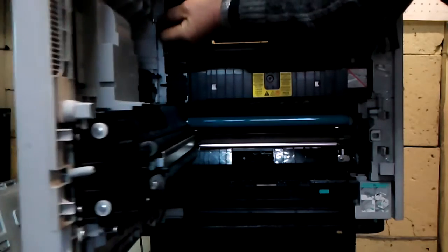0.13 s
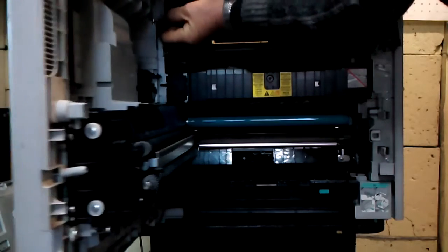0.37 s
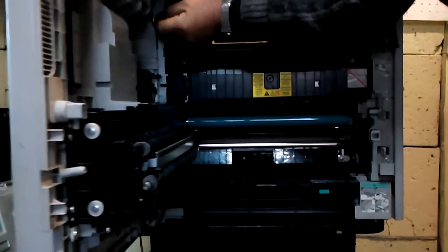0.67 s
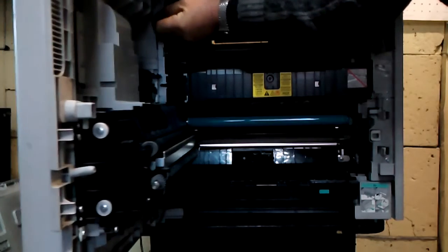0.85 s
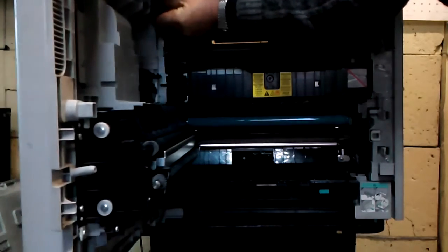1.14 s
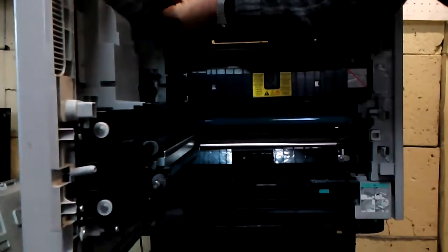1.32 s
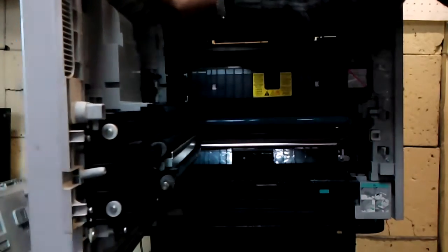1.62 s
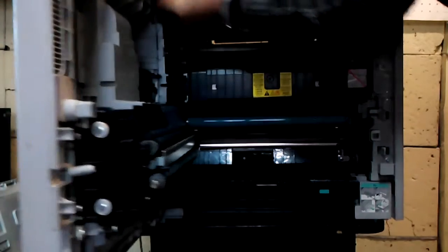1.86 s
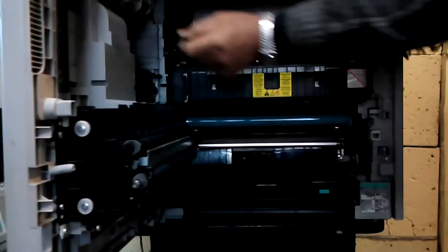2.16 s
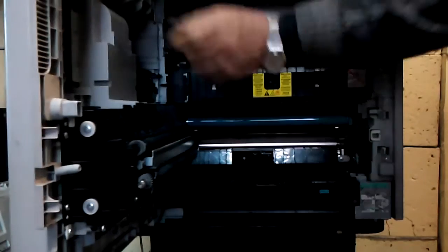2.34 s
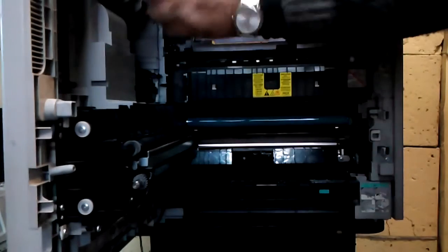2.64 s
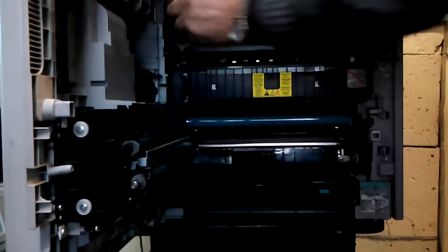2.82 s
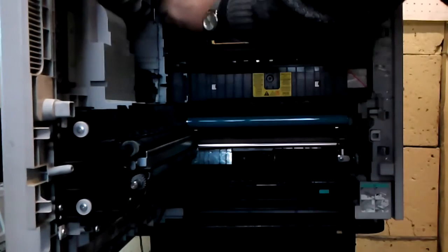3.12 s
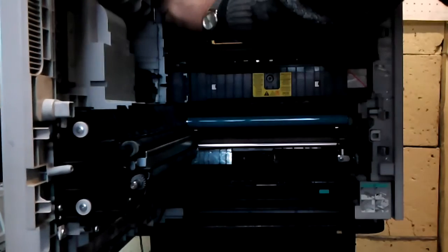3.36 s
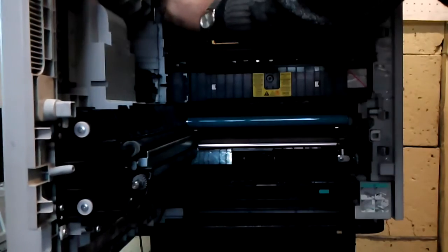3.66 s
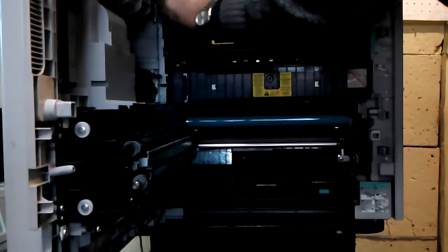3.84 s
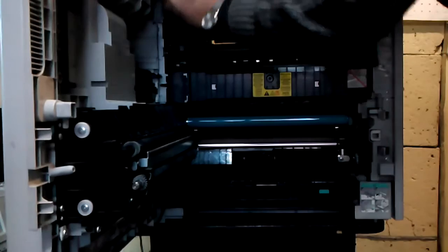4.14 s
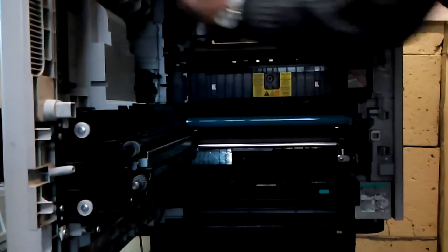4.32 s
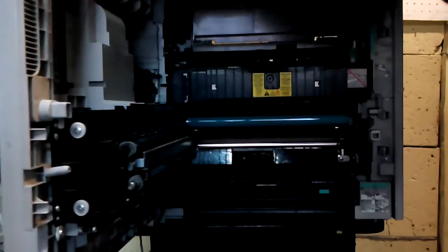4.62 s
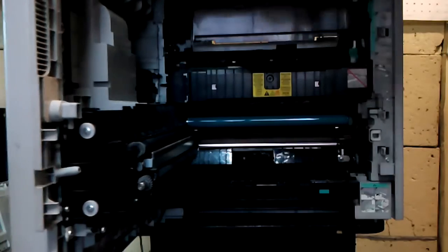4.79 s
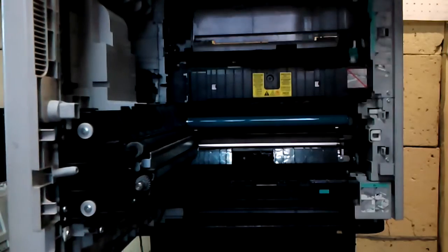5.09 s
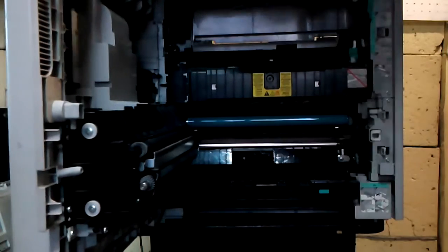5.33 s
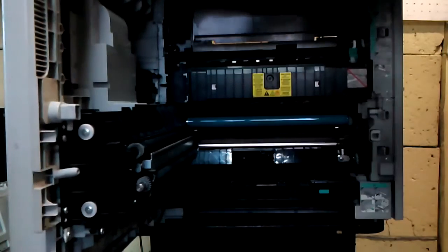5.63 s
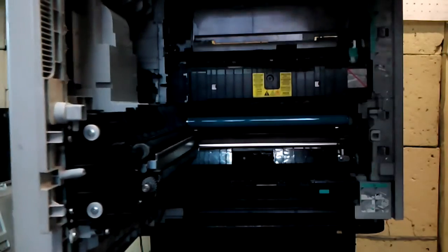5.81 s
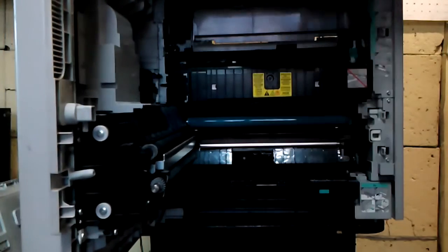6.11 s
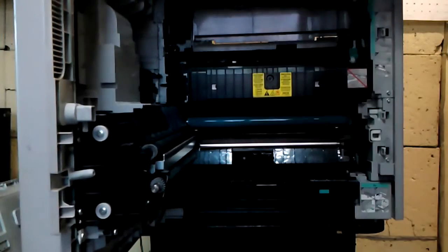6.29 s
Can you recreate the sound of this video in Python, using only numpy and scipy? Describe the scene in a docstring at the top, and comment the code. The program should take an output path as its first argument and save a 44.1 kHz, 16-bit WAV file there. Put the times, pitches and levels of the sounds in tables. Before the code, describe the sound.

Inside a small hard room, a hand works a plastic panel loose from an open copier, heard near a small camera with constant low hiss, very thin whines and rapid faint electrical ticks. A tiny scrape and tap open it; light knocks come at 0.3 and 0.5 s. From 1.0 to 1.3 s brushing, a rub and firm knocks with a dull thump. Between 1.6 and 2.1 s scrapes mix with chattering blows, strongest near 1.85. A hard, loud crack hits at 2.5 s, followed by a short scrape and smaller knocks. Soft rubbing around 3 s leads to a low thump and double knock near 3.4. Sparse clicks at 4.1 to 4.8 s grow into knocks from 5.0 and a sharp crack at 5.25. After soft bumps, a strong airy brush swells at 5.9 s, then a final short bright crack at 6.4. Contacts echo briefly.

```python
"""A hand works a plastic panel loose inside an open office copier, in a small hard room, for 6.5 s.
A small camera's hiss, thin whines and faint electrical ticks per picture run throughout.
From the start come scrapes of stick-slip grains, brushes of fine noise from sleeve and skin, soft bumps
and chattering blows that ring the panel; a hard crack falls near 2.5 s, another near 5.2 s, then a
strong brush near 5.9 s and a last bright crack near 6.4 s. Contacts and strokes echo in the room."""
import sys
import numpy as np
from scipy import signal
from scipy.fft import rfft, irfft
from scipy.io import wavfile
from scipy.ndimage import uniform_filter1d

SR = 44100
rng = np.random.default_rng(int(sys.argv[2]) if len(sys.argv) > 2 else 0)


def materialize(psi):
    """Save the field psi as 16-bit PCM at rate SR to the path in sys.argv[1].

    A 1-D psi becomes a single channel; in a 2-D psi each row is a channel.
    """
    bounded = np.clip(np.atleast_2d(psi).T, -1, 1)
    quanta = np.round(bounded * 32767).astype(np.int16)
    wavfile.write(sys.argv[1], SR, quanta)


N = 285139

# Steady noise bed, relative density: pitch_hz, level_db (per Hz)
HISS_SPECTRUM = [(18, -61), (30, -4), (97, 4.5), (256, 4), (399, -7.5), (830, 0), (945, -6), (1680, -7),
                 (4310, -12.5), (7080, -7.5), (7650, -6.5), (8720, -10), (15500, -15.5)]
# Thin whines: pitch_hz, level_db (rms, before flutter)
WHINE_TONES = [(1168, -89.5), (6449, -87.5), (12898, -98)]
# Wait of the two supply dips after each picture starts, before the next timer tick: delay_ms
DIP_DELAYS = [12.77, 18.63]
# Delay of the two supply steps after each picture starts: delay_ms
STEP_DELAYS = [9.05, 20.65]
# Time for the room to fade by 60 dB: pitch_hz, t60_s
ROOM_FADE = [(150, 0.34), (400, 0.35), (1000, 0.27), (2800, 0.27), (7000, 0.32), (13000, 0.28)]
# Strokes of plastic on plastic: peak_s, rise_s, fall_s, peak_db
SCRAPE_STROKES = [(0, .01, 0.042, -57), (.36, 0.083, 0.35, -65), (.49, .08, 0.086, -64.5),
                  (1.09, 0.031, 0.13, -66.5), (1.19, 0.14, 0.071, -69), (1.28, 0.14, .07, -57),
                  (1.63, 0.1, 0.082, -55.5), (1.73, .08, 0.095, -62.5), (2.06, 0.098, 0.11, -58),
                  (2.14, 0.076, 0.11, -54), (2.317, .01, 0.044, -59.5), (2.37, .08, 0.16, -69.5),
                  (2.626, 0.007, 0.095, -52.5), (2.73, .1, 0.048, -68), (3.21, 0.053, .1, -67),
                  (3.33, 0.045, 0.18, -68.5), (4.16, 0.1, .12, -60.5), (4.69, .09, 0.045, -61.5),
                  (5.93, 0.067, 0.15, -56), (6.1, .03, 0.087, -70)]
# Broad plastic resonances, relative levels: pitch_hz, width_hz, level_db
SCRAPE_BANDS = [(467, 570, -29), (672, 1340, 11), (1130, 530, 9.5), (1640, 680, 0), (2160, 820, -1)]
# Strokes of cloth and skin: peak_s, rise_s, fall_s, peak_db, fullness_db_per_octave (beside the hump)
BRUSH_STROKES = [(.505, 0.21, 0.16, -64, 6), (.92, 0.13, 0.15, -66.5, 1), (1.04, 0.022, 0.11, -54.5, -7),
                 (1.22, 0.13, .18, -58.5, 1), (1.36, 0.086, 0.12, -58, 7), (1.57, 0.11, 0.052, -60.5, -1),
                 (1.648, 0.027, 0.18, -60.5, 6), (1.78, 0.13, 0.13, -68.5, -2), (2.02, 0.054, .04, -62, 10),
                 (2.08, 0.053, 0.023, -53, 6), (2.2, 0.23, 0.28, -63, -3), (2.37, .05, 0.45, -63, 0.5),
                 (2.99, .25, 0.25, -59.5, -0.5), (3.216, .08, 0.093, -63, -16),
                 (3.326, 0.052, 0.17, -58.5, 2.5), (3.5, .05, 0.037, -59, 5), (3.53, .05, 0.29, -62.5, 3),
                 (4.03, 0.11, .15, -68.5, 6), (4.115, 0.034, 0.045, -64.5, 6.5), (5.45, .08, .08, -73, 2.5),
                 (5.51, 0.035, 0.13, -63, 7), (5.856, 0.012, 0.084, -49, -1),
                 (5.914, 0.071, 0.15, -42, 3.5), (6.09, 0.15, 0.11, -52.5, -1.5),
                 (6.35, 0.43, 0.29, -66.5, -3)]
# Colour of the brush, relative gain of its fine bands: pitch_hz, level_db
BRUSH_COLOUR = [(1180, -43), (2000, -13), (2450, -10.5), (2660, -9), (3340, -7), (3550, 11), (3860, -3.5),
                (4270, -4), (7640, 4), (15000, -29)]
# Ringing modes of panel and casing, relative levels: pitch_hz, level_db, t60_s (ringing free)
PANEL_MODES = [(143, -15, 0.083), (179.7, -4, 0.048), (212, -9.5, 0.064), (272, 2.5, 0.052),
               (688, -2, 0.27), (932, 3, 0.095), (942, -3, 0.032), (1076, 11, 0.021), (1280, -2, 0.052),
               (1343, 1.5, 0.15), (1557, 4, 0.093), (1756, -0.5, 0.031), (2102, 9.5, 0.016),
               (2524, 7, 0.045), (2820, 15.5, 0.0061), (3475, -5, 0.013), (4365, 17.5, 0.0062),
               (5020, 21.5, 0.01), (5800, 4, 0.056), (7700, -26, .015)]
# Soft bumps of hand and panel: start_s, peak_db, favoured_hz, room_db (trim on the echoes)
SOFT_BUMPS = [(0.012, -58, 320, -11), (0.515, -47.5, 160, -11), (1.209, -53, 162, -4),
              (1.301, -34, 304, -9), (1.596, -50, 154, -6), (1.649, -55.5, 216, 1.5),
              (1.85, -47.5, 336, -16), (1.995, -39, 220, -10), (2.073, -64, 369, -8),
              (2.101, -42.5, 145, -9.5), (2.635, -48, 219, -12), (3.386, -32, 184, -8),
              (3.409, -42, 158, -6), (3.441, -43, 301, -11), (3.48, -42.5, 160, -10.5), (4.2, -60, 377, 0),
              (4.756, -54.5, 142, -14), (5.255, -59, 254, -4), (5.31, -49, 272, -11),
              (5.436, -47.5, 288, -2), (5.5, -50.5, 356, -3.5), (5.907, -67, 208, -9)]
# Hard contacts: start_s, knock_db, favoured_hz, hump_db (at that ring), click_db,
# fall_db_per_octave (above the click's top), contact_ms, room_db (trim on the echoes)
HARD_BLOWS = [(0.011, -64, 1210, -46.5, -80, -2, 2.5, -6), (0.341, -52, 1400, -62, -70, -17, 4.3, 5),
              (0.513, -30, 1206, -60, -32, -37, 2, 1), (0.882, -64, 6900, -67, -62, -10, 5.1, 9),
              (1.029, -53.5, 4765, -68, -40, -39, 8.8, 5), (1.207, -34.5, 1458, -35.5, -41, -28, 2.3, -9.5),
              (1.304, -26.5, 649, -36.5, -22.5, -40, 6.1, -8),
              (1.584, -37, 840, -43.5, -38.5, -45, 3.2, 0.5), (1.651, -54, 663, -56, -35.5, -30, 3.4, -3),
              (1.767, -39.5, 1180, -46, -49, -42, 5.9, 1.5), (1.816, -40, 1636, -34, -58, -26, 4, -1),
              (1.85, -24, 1900, -26, -28.5, -47, 7.1, -4.5),
              (1.998, -40.5, 4080, -29, -27.5, -44, 6.2, -8.5), (2.003, -59, 560, -42.5, -68, -18, 6.8, -3),
              (2.076, -45, 4040, -42, -46, -18, 4, -2), (2.102, -73, 740, -39.5, -52, -12, 2, -1.5),
              (2.469, -34.5, 1213, -36.5, -47, -25, 12.6, -2.5),
              (2.515, -38.5, 2674, -32.5, -27, -46, 4.9, 5.5), (2.529, -29, 4615, -14.5, -7, -29, 11, -6),
              (2.624, -37.5, 1126, -57, -63, -8, 10.3, -7.5),
              (2.713, -45.5, 1013, -48.5, -50, -10, 4.7, -7.5),
              (3.199, -53.5, 1690, -59, -62, -15, 2.8, 6.5),
              (3.443, -31.5, 1960, -57, -25.5, -34, 4.5, -3.5),
              (3.479, -34, 1266, -53, -38, -25, 7.3, -3.5), (4.13, -43.5, 1204, -44, -51, -46, 4.6, 8),
              (4.184, -41, 740, -44, -53, -15, 2.8, 0), (4.444, -48, 4176, -38, -33, -30, 6.6, -7.5),
              (4.754, -54, 6680, -56, -41, -26, 3.6, 5.5), (4.767, -46, 6500, -46, -24, -24.5, 2.5, -3.5),
              (4.843, -51, 7100, -31, -39, -53, 5.6, -7.5), (5.035, -49, 3440, -41.5, -50, -12, 8.5, 7),
              (5.042, -36, 1270, -55, -23.5, -32, 4.3, -7.5), (5.134, -31.5, 1131, -51, -41, -56, 7.9, 1.5),
              (5.244, -22, 6700, -31, -10.5, -24.5, 16.6, -0.5), (5.256, -24, 870, -27, -33, 0, 5.8, -4),
              (5.53, -46.5, 3280, -37, -29.5, -14.5, 2.9, -2), (5.846, -61, 6860, -52, -48, -29, 4, -6),
              (5.858, -51, 2900, -60, -38, -17, 2.9, -8), (6.216, -67, 2750, -57, -41, -16, 7.6, -6),
              (6.416, -35, 3740, -11.5, -6.5, -43, 1.84, -12.5), (6.444, -39, 984, -46, -57, -16, 5.8, 1.5)]
# Broad knock curve, raised by knock_db: pitch_hz, level_db (per octave)
KNOCK_COLOUR = [(200, -45), (480, -24.5), (920, -12), (1900, -1), (3800, -7), (6800, -4), (10000, -42),
                (15500, -52)]
# Bright click curve, raised by click_db: pitch_hz, level_db (per octave)
CLICK_COLOUR = [(200, -65), (480, -64.5), (920, -42.5), (1900, -20.5), (3800, -13), (6800, 2.5),
                (10000, 7.5), (15500, 14)]

PICTURE_HZ, TIMER_HZ, TIMER_START_S = 27.3417, 1033.74, .000717
LOW_MODES = 4  # the first panel modes answer only to soft bumps
STROKE_DEPTH_DB = 20  # drop from the peak one rise before it and one fall after it
SCRAPE_ROUND, BRUSH_ROUND = 1.33, 1.45  # stroke shape: 1 pointed, 2 rounded
HAND_DAMPING, DAMPING_HZ = .7, 149  # share of ring time left under the hand; less above this pitch
CLICK_HZ, HUMP_DB = 6800, -32  # top of the click; fall of the hump one octave from its ring
SHARP_MS = 3  # longer contacts start with a weaker first click


def undb(db):
    """Decibels to gain."""
    return 10 ** (np.asarray(db) / 20)


def level(x, db):
    """Scale to an rms level."""
    return x * undb(db) / np.sqrt(np.mean(x ** 2))


def band(x, lo_hz, hi_hz):
    """Causal band-pass."""
    edges = [lo_hz, min(hi_hz, .45 * SR)]
    return signal.sosfilt(signal.butter(2, edges, "band", fs=SR, output="sos"), x)


def add(bus, x, s):
    """Mix a short sound in at a time."""
    i = int(s * SR)
    bus[i:i + len(x)] += x[:len(bus) - i]


def along(hz, points):
    """Read a (pitch, value) curve on a log-frequency axis."""
    at, value = np.transpose(points)
    return np.interp(np.log(hz), np.log(at), value)


def walk(rate):
    """Random glide to a new value, rate times a second; spread near 1."""
    k = int(SR / rate)
    held = np.repeat(rng.standard_normal(N // k + 1), k)
    return 1.22 * uniform_filter1d(held, k)[:N]


def hiss():
    """Room rumble and preamp hiss as shaped noise with a slow drift, plus thin whines that flutter."""
    hz = np.maximum(np.arange(N // 2 + 1) * SR / N, 1)
    noise = irfft(rfft(rng.standard_normal(N)) * undb(along(hz, HISS_SPECTRUM)), N)
    t = np.arange(N) / SR
    whines = 0
    for pitch_hz, level_db in WHINE_TONES:
        gain = np.sqrt(2) * undb(level_db + 4.6 * walk(15))
        whines = whines + gain * np.sin(2 * np.pi * pitch_hz * t)
    return level(noise, -69) * undb(walk(3.03)) + whines


def ticks(dip_db=-51.0, step_db=-61.5):
    """Supply ripple: two short dips and two decaying steps for each picture read out."""
    out, t = np.zeros(N), np.arange(300) / SR
    dip_s = .0002  # bottom of the dip
    recovery = 0.08 * (t > .0003) * np.exp(-t / 0.00062)
    dip = recovery - np.exp(-.5 * ((t - dip_s) / .00007) ** 2)
    step = (1 - np.exp(-t / .0001)) * np.exp(-t / 0.00092)
    for start in np.arange(0, N / SR - .02, 1 / PICTURE_HZ):
        for ms in DIP_DELAYS:
            # each dip waits for the next timer tick
            timer_count = np.ceil((start + ms / 1000 - TIMER_START_S) * TIMER_HZ)
            add(out, undb(dip_db) * dip, timer_count / TIMER_HZ + TIMER_START_S - dip_s)
        # steps go up or down by chance
        for ms, size in zip(STEP_DELAYS, rng.uniform(-2.88, 2, size=2)):
            add(out, undb(step_db) * size * step, start + ms / 1000)
    return out


def echoes(count, gap_ms=0.51, build_ms=9.7, db=5.0):
    """Room responses for several places: dense echoes build up, then each half-octave band fades."""
    t = np.arange(SR // 2) / SR
    out = 0
    for hz in 90 * 2 ** np.arange(0, 8, .5):
        fade = np.exp(-np.log(1000) * t / along(hz, ROOM_FADE))
        noise = rng.standard_normal((count, len(t)))
        out = out + fade * band(noise, hz / 2 ** .25, hz * 2 ** .25)
    out *= np.clip((1000 * t - gap_ms) / build_ms, 0, 1)
    return undb(db) * out / np.sqrt(np.sum(out ** 2, axis=1, keepdims=True))


def strokes(rows, roundness, step=44):
    """Gain of strokes that swell and fade, and any further columns, led by the loudest stroke."""
    t = np.arange(0, N, step) / SR
    peak_s, rise, fall, db, *more = np.array(rows, float).T[:, :, None]
    away = np.abs(t - peak_s) / np.maximum(np.where(t < peak_s, rise, fall), .003)
    power = undb(db - STROKE_DEPTH_DB * away ** roundness) ** 2 + 1e-14
    total = power.sum(axis=0)
    curves = [np.sqrt(total)]
    for column in more:
        curves.append(np.sum(column * power, axis=0) / total)
    return [np.interp(np.arange(N) / SR, t, curve) for curve in curves]


def scraping():
    """Plastic on plastic: uneven stick-slip grains drive broad resonances."""
    (gain,) = strokes(SCRAPE_STROKES, SCRAPE_ROUND)
    grain_db = 2.8 * rng.exponential(size=N) + 3 * walk(90)
    grains = rng.standard_normal(N) * undb(grain_db)
    scrape = 0
    for hz, width_hz, db in SCRAPE_BANDS:
        scrape = scrape + undb(db) * band(grains, hz - width_hz / 2, hz + width_hz / 2)
    return level(scrape, 0) * gain


def brushing():
    """Cloth and skin: many fibres catch as fine, higher noise; fullness lifts bands beside the hump."""
    gain, fullness = strokes(BRUSH_STROKES, BRUSH_ROUND)
    fibres = undb(2.4 * rng.exponential(size=N) + 2 * walk(170))
    brush = 0
    for hz in 2000 * 2 ** np.arange(0, 3, .25):
        fine = band(rng.standard_normal(N) * fibres, hz * .92, hz * 1.09)
        fuller_db = fullness * max(np.log2(7400 / hz), 1.3 * np.log2(hz / 8600), 0)
        brush = brush + undb(along(hz, BRUSH_COLOUR) + fuller_db + 2 * walk(30)) * fine
    return level(brush, 0) * gain


def rings(modes, favoured_hz, octaves, focus_db, share=1.0):
    """The panel's ringing; the place of contact favours modes near one pitch and shifts all a little."""
    t, chance = np.arange(8192) / SR, rng.standard_normal((len(modes), 2))
    hz, db, t60 = np.array(modes).T[:, :, None]
    focus = np.exp(-(np.log2(hz / favoured_hz) / octaves) ** 2)
    gain = undb(db + focus_db * focus + 2 * chance[:, :1])
    shifted_hz = hz * (1 + 0.011 * chance[:, 1:])
    fade = np.exp(-np.log(1000) * t / (t60 * max(share, .1)))
    return np.sum(gain * np.sin(2 * np.pi * shifted_hz * t) * fade, axis=0)


def thuds(rooms):
    """A soft contact builds up over a few ms and wakes only the lowest modes."""
    out = np.zeros(N)
    rise = 1 - np.exp(-(np.arange(8192) / SR / 0.0051) ** 2)
    for k, (start_s, peak_db, hz, room_db) in enumerate(SOFT_BUMPS):
        share = HAND_DAMPING * min(DAMPING_HZ / hz, 1)
        thud = band(rise * rings(PANEL_MODES[:LOW_MODES], hz, .3, 14, share), 97, 790)
        thud *= undb(peak_db) / np.abs(thud).max()
        add(out, thud, start_s)
        add(out, undb(room_db) * signal.fftconvolve(thud, rooms[k % len(rooms)]), start_s)
    return out


def colour_of(hz, knock_db, ring_hz, hump_db, click_db, fall_db):
    """Gain per frequency: broad knock, hump at the favoured ring and bright click, added as powers."""
    knock = knock_db + along(hz, KNOCK_COLOUR)
    hump = hump_db + HUMP_DB * np.log2(hz / ring_hz) ** 2
    click = click_db + along(hz, CLICK_COLOUR) + fall_db * np.maximum(np.log2(hz / CLICK_HZ), 0)
    return np.sqrt(np.sum(undb([knock, hump, click]) ** 2, axis=0)) * SR / (2.6 * hz)


def causal(log_gain):
    """Shortest causal response with this gain, by way of the cepstrum."""
    cepstrum = irfft(log_gain)
    cepstrum[1:len(log_gain) - 1] *= 2
    cepstrum[len(log_gain):] = 0
    return irfft(np.exp(rfft(cepstrum)))


def blow(ring_hz, colour, contact_ms, ring_db=-16.0):
    """A click and a short chatter crack and ring the panel; returns the close sound and the room's feed."""
    t = np.arange(8192) / SR
    chance = rng.standard_normal((2, len(t)))
    contact_s = max(contact_ms, .2) / 1000
    chatter = chance[0] * undb(10.5 * chance[1]) * np.exp(-t / contact_s)
    # longer contacts carry more energy
    push = chatter / np.sqrt(np.sum(chatter ** 2)) * np.sqrt(contact_s / 0.0038)
    push[0] = min(SHARP_MS / (1000 * contact_s), 1)
    body = undb(ring_db) * 0.018 * rings(PANEL_MODES[LOW_MODES:], ring_hz, 0.084, 22.2)
    body[0] += 1  # the direct crack
    click = signal.fftconvolve(body, causal(np.log(colour)))[:len(t)]
    near = signal.fftconvolve(push, click)[:len(t)]
    # the room gathers the chatter from all sides into one even click
    return near, click * np.sqrt(np.sum(push ** 2))


def blows(rooms):
    """All hard contacts with their echoes; neighbouring blows come from different places."""
    out, hz = np.zeros(N), np.maximum(np.arange(1, 514) * SR / 1024, 200)
    for k, (start_s, knock_db, ring_hz, hump_db, click_db, fall_db, contact_ms, room_db) in enumerate(HARD_BLOWS):
        colour = colour_of(hz, knock_db, ring_hz, hump_db, click_db, fall_db)
        near, far = blow(ring_hz, colour, contact_ms)
        add(out, near, start_s)
        add(out, undb(room_db) * signal.fftconvolve(far, rooms[k % len(rooms)]), start_s)
    return out


def scene():
    """Blows, bumps and rubbing in the room, over the noise of the camera."""
    rooms = echoes(count=11)
    rub = scraping() + brushing()
    rub_echo = undb(-10.5) * signal.fftconvolve(rub, rooms[0])[:N]
    background = hiss() + ticks()
    return (background + rub + rub_echo + thuds(rooms) + blows(rooms))[None]


def record(dry):
    """The microphone dips in the low treble; the recorder cuts the deep bass and the top."""
    dip_band = signal.lfilter(*signal.iirpeak(3325, 7.7, fs=SR), dry)  # centre Hz, Q
    dry = dry - 0.16 * dip_band
    dry = signal.sosfilt(signal.butter(2, 60, "high", fs=SR, output="sos"), dry)
    return signal.sosfilt(signal.ellip(10, .2, 80, 15500, fs=SR, output="sos"), dry)


dry = scene()
out = record(dry)
materialize(out)
```